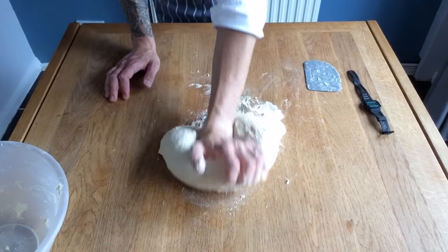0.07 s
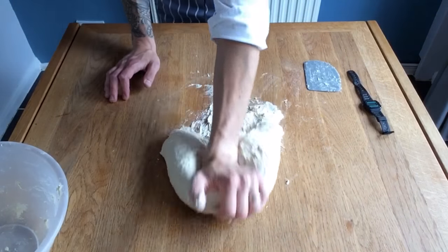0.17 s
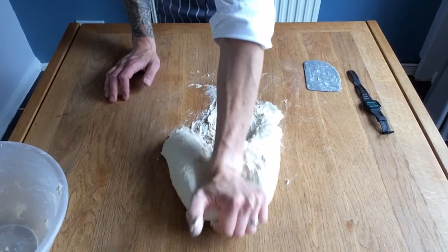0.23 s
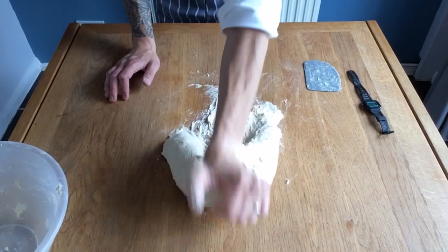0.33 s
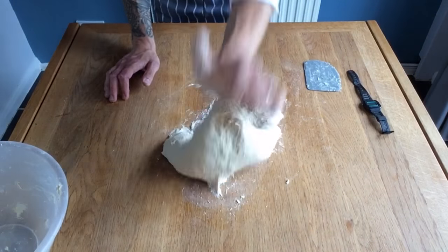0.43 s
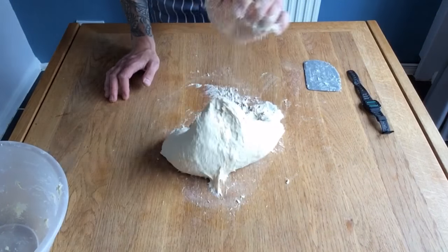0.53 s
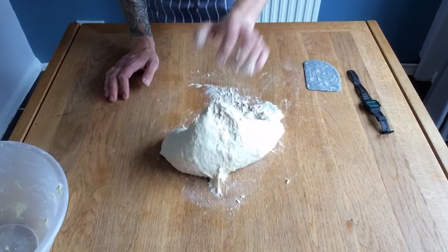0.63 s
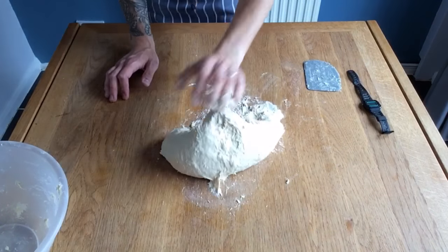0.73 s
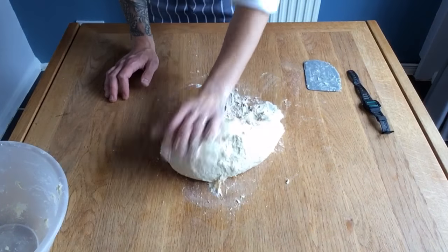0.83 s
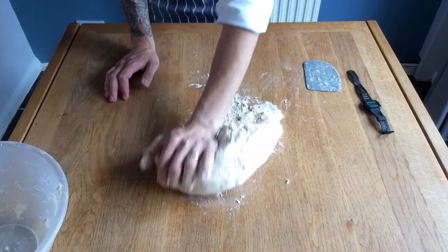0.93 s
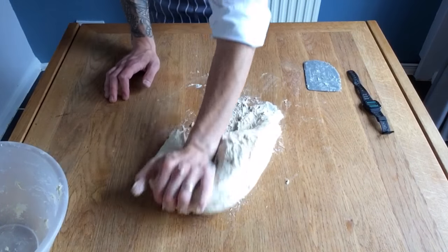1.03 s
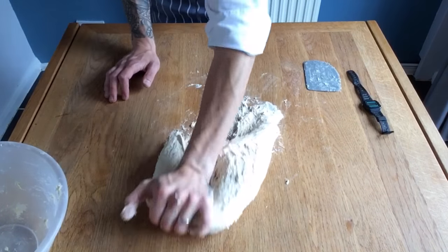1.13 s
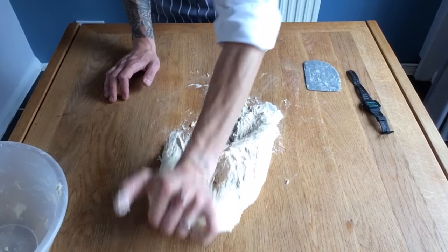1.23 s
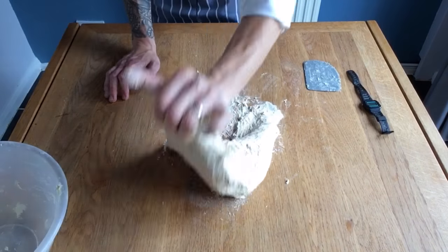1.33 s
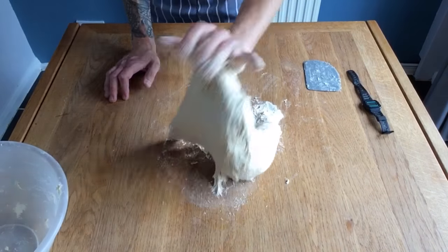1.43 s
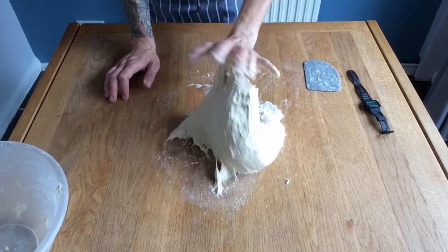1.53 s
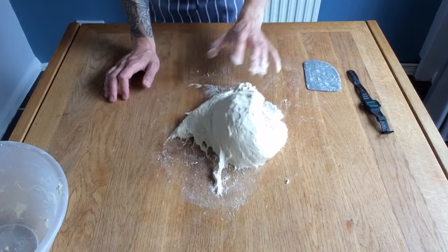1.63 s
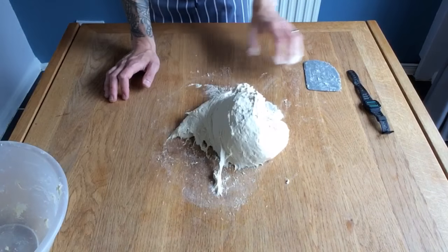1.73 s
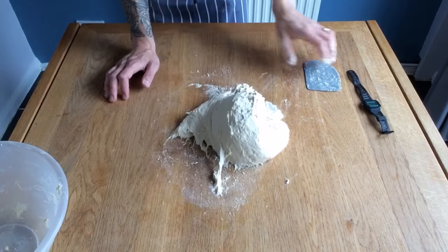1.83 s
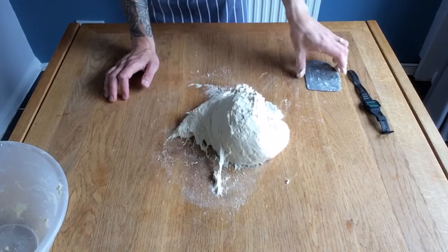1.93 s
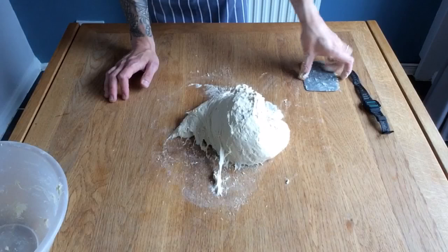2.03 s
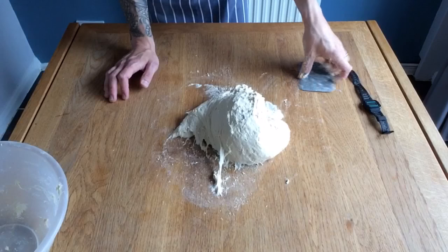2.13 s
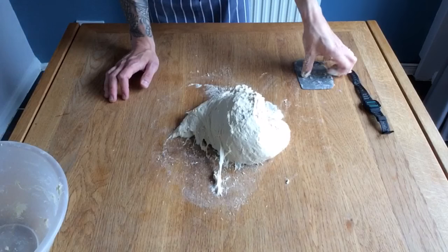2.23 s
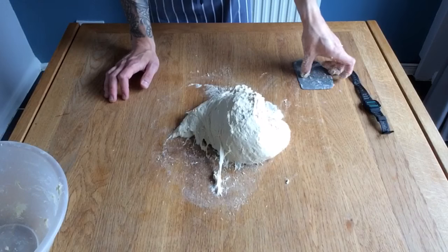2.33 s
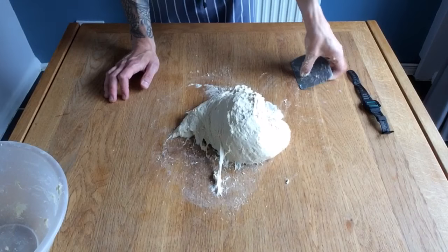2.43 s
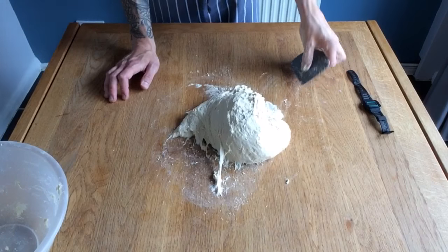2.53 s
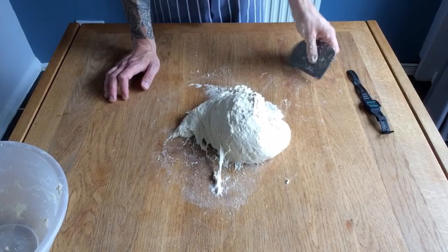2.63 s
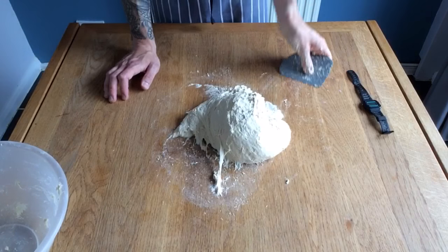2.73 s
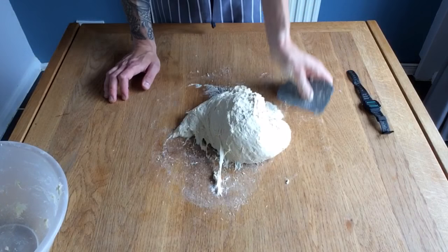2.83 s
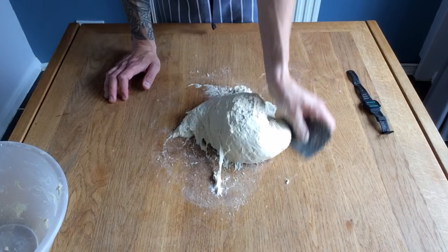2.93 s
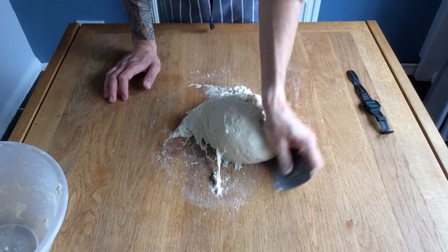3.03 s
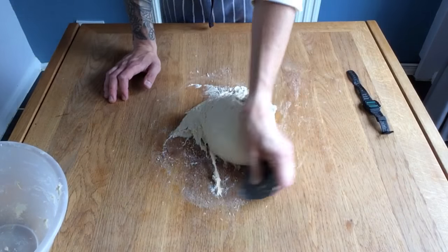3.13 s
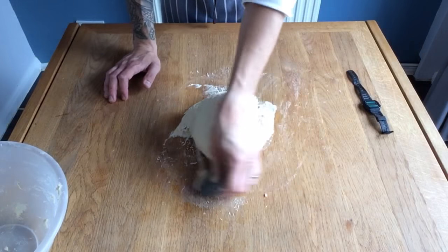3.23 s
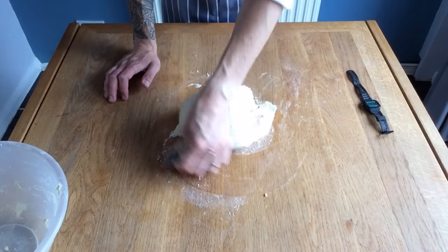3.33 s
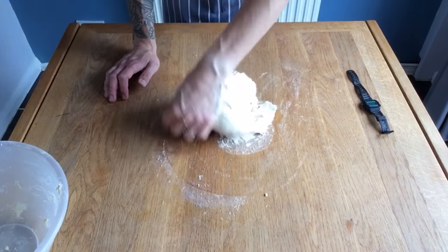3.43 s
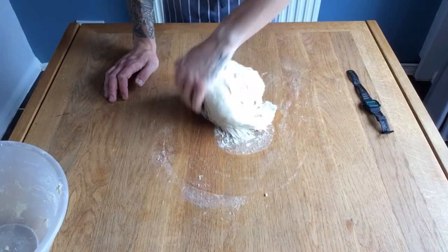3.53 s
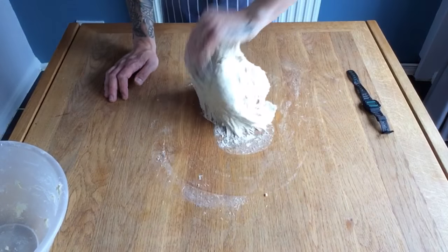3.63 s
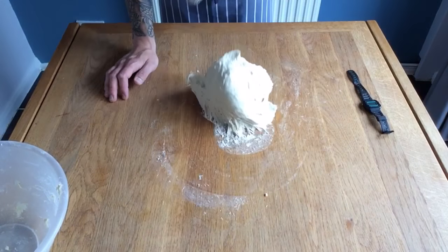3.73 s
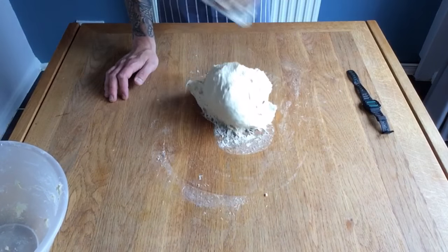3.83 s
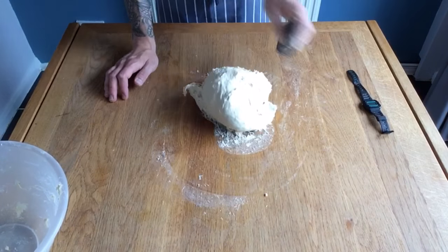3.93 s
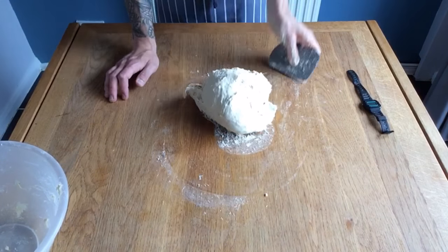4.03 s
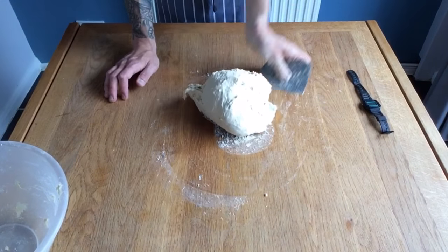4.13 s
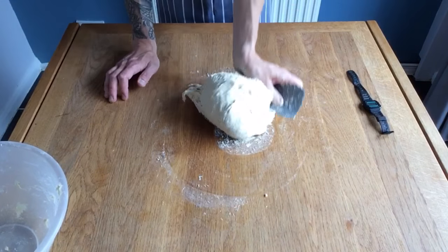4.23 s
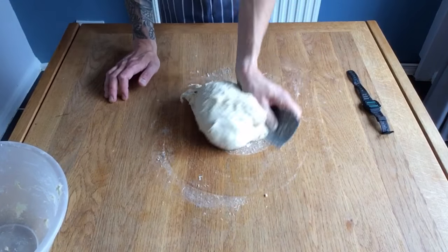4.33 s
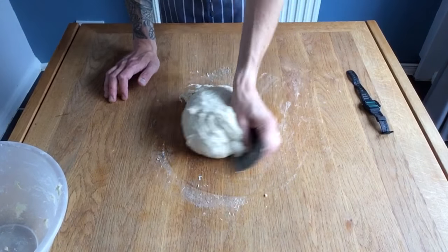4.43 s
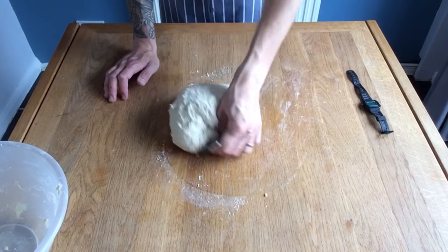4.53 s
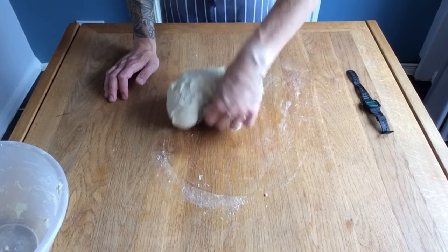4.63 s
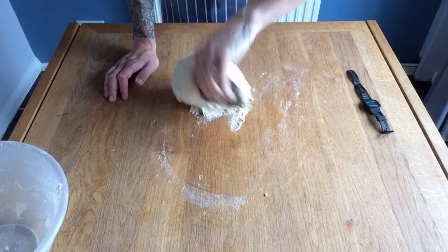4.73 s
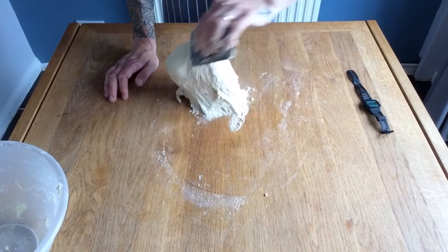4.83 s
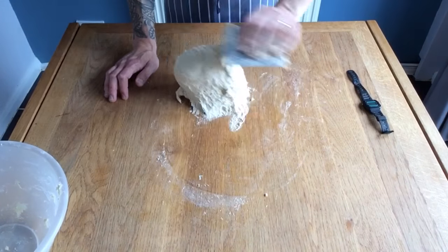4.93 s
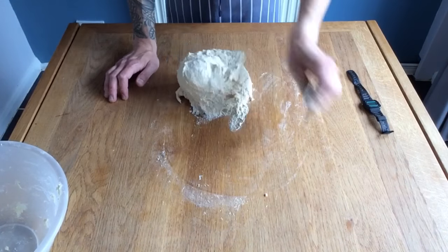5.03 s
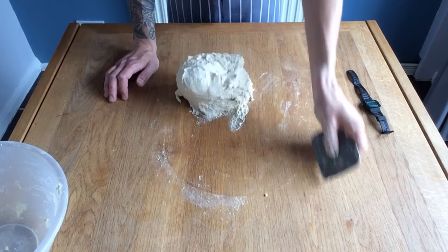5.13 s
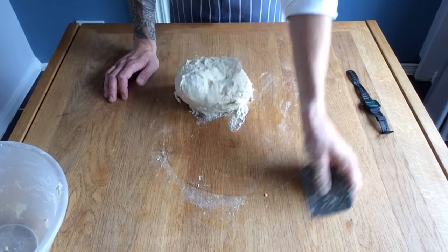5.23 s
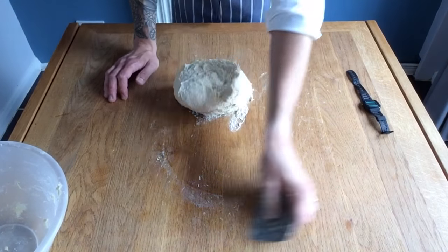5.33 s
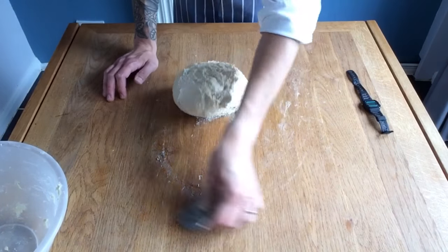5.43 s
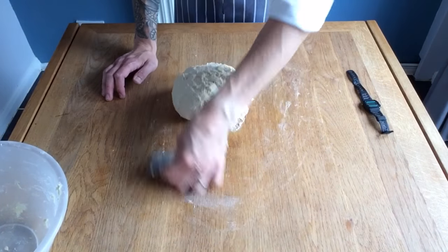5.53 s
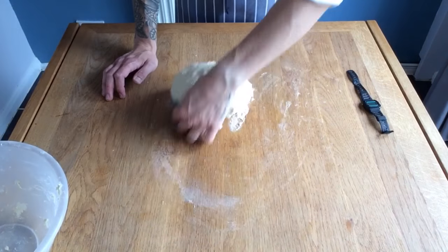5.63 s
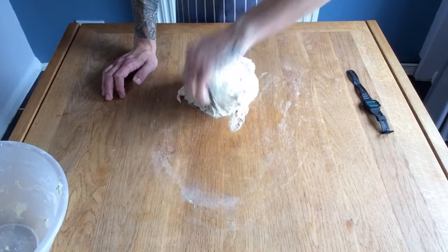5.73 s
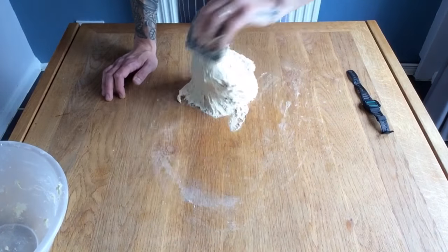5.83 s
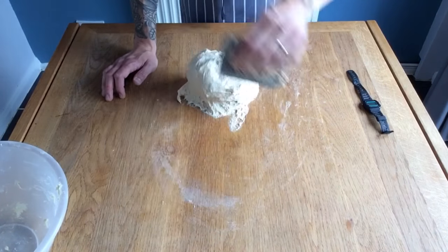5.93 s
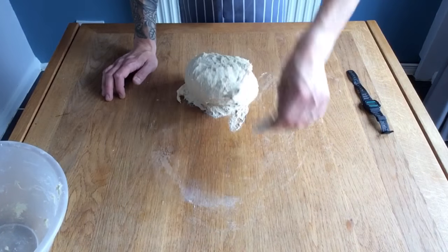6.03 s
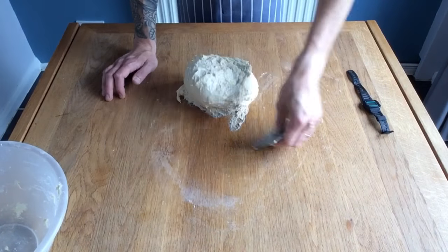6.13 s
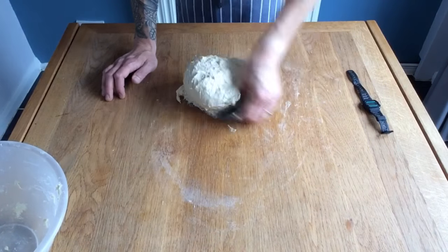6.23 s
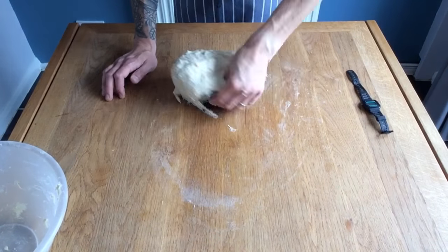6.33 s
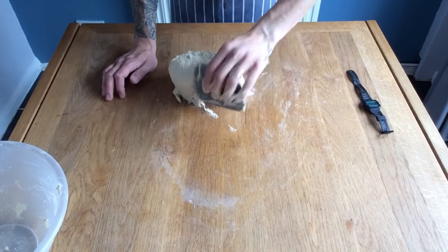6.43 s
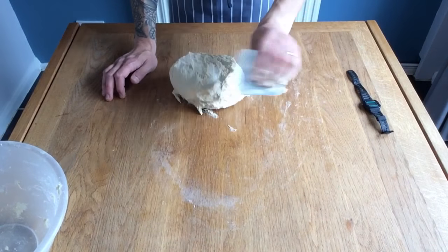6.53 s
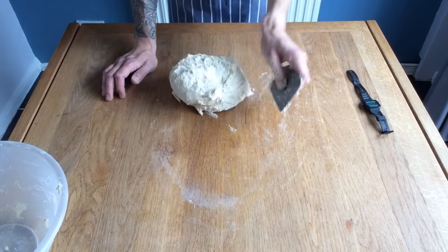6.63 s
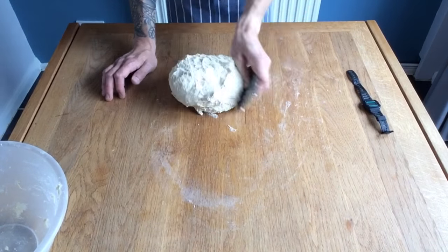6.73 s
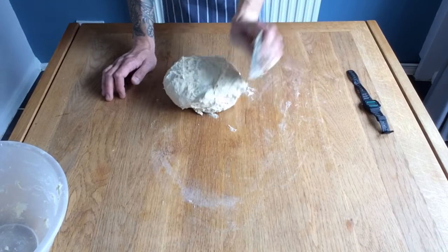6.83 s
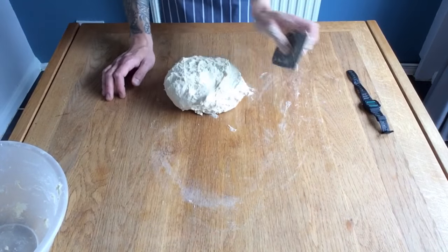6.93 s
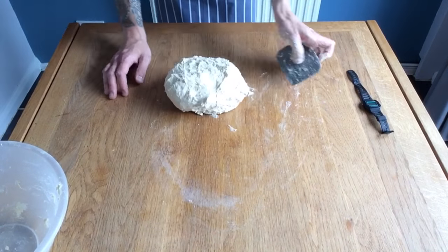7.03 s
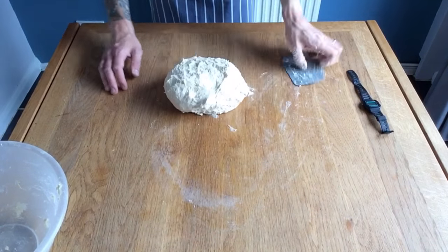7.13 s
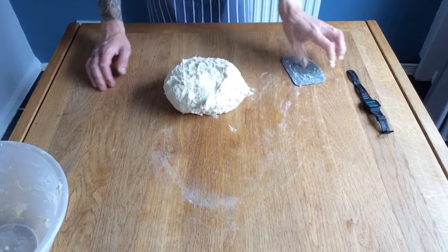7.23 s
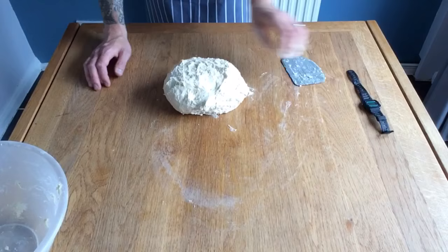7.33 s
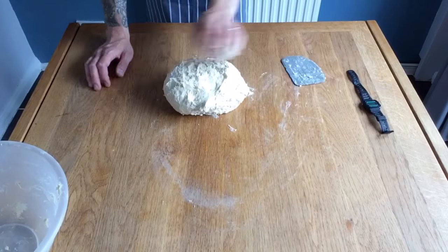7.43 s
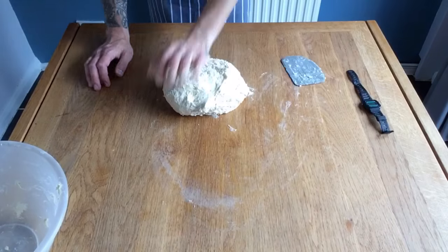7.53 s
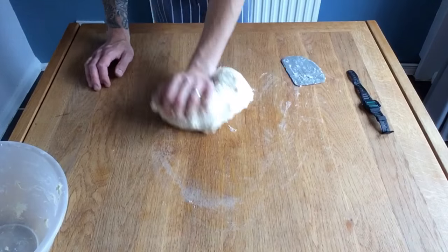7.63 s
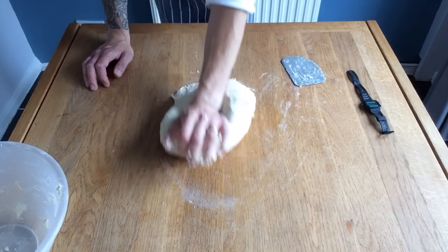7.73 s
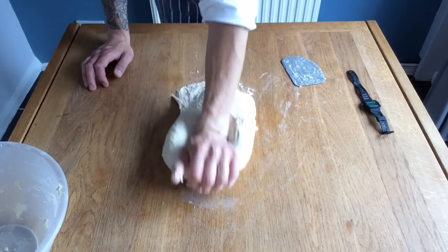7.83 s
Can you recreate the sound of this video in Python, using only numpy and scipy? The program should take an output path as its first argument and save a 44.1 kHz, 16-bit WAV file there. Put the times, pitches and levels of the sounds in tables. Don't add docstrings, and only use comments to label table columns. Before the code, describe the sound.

Close up in a small, reflective kitchen with quiet room hush: damp dough peels off skin with a fine crackling fizz while the tabletop booms softly. After light plastic ticks, a thin scraper edge rubs gritty strokes over floured wood, the later ones starting with sharp knocks. It slaps down flat, bounces and rattles to rest, then sticky kneading resumes gently.

```python
import sys
import numpy as np
from scipy import signal
from scipy.fft import rfft, irfft, next_fast_len
from scipy.io import wavfile
from scipy.ndimage import uniform_filter1d

SR = 44100
rng = np.random.default_rng(int(sys.argv[2]) if len(sys.argv) > 2 else 0)


def how_loud(loudness_db):
    steps = np.asarray(loudness_db, float) / 20
    return 10 ** steps


def dump(signal):
    limited = np.clip(np.atleast_2d(signal).T, -1, 1)
    pcm = np.round(limited * 32767).astype(np.int16)
    wavfile.write(sys.argv[1], SR, pcm)


N = 347508

# (frequency [Hz], level [dB per Hz])
AIR_COLOUR = [(12, -52), (20, -15), (161, -5.5), (258, -11.5), (331, -6.5), (488, -16), (610, -11.5),
              (783, -17), (1960, -23), (2890, -26), (7640, -30), (8540, -33.5), (14100, -34), (15300, -35)]
AIR_DB = -65
# (frequency [Hz], width [Hz], level [dB])
APPLIANCE_HUM = [(156.2, 4.4, -71)]
# (time [s], level [dB])
FAR_WHINE = [
    [(0.3, -82), (0.524, -71), (0.8, -75), (0.95, -90), (1.2, -89)],
    [(1.8, -84), (1.83, -89), (2.05, -79)],
    [(2.15, -76), (2.438, -77), (2.45, -79)],
]
# (frequency [Hz], time to fall 60 dB [s])
KITCHEN_RING = [(125, 0.41), (500, 0.29), (2000, 0.36), (5000, 0.065), (12000, 0.2)]

# (frequency [Hz], width [Hz], level [dB])
TABLE_MODES = [(73.4, 48, -19), (130.5, 12, 3), (219.2, 15, -2), (250.5, 20, -1), (333.4, 44, -2),
               (385.7, 34, -1.5), (452, 37, -3), (530, 14, -3.5), (608, 103, 1.5)]
# (frequency [Hz], width [Hz], level [dB])
TOP_RING = [(258, 9, 5), (382, 9, 16)]
# (frequency [Hz], width [Hz], level [dB])
WOOD_MODES = [(725, 130, -3.5), (1046, 73, 2), (1400, 30, -10), (1947, 47, 0), (3150, 110, -11)]
# (frequency [Hz], width [Hz], level [dB])
PLASTIC_MODES = [(932, 280, 5.5), (1123, 44, 7.5), (1390, 22, 2.5), (1820, 600, 7.5), (1976, 66, 7),
                 (2480, 110, -12)]
# (frequency [Hz], width [Hz], level [dB])
EDGE_MODES = [(3320, 2700, 17), (4170, 210, -4), (5530, 320, -24), (6580, 340, 15), (7500, 630, -4)]

# (frequency [Hz], level [dB per Hz])
FIZZ_COLOUR = [(1470, -8), (2500, -5.5), (4430, -4), (5240, -4.5), (7740, -3), (8810, -7.5), (14700, -6),
               (15500, -2.5)]
# (frequency [Hz], level [dB per Hz])
SQUELCH_COLOUR = [(290, -10), (500, 3.5), (757, -15), (828, 1), (1110, -2), (1640, -5.5), (3500, -13.5),
                  (4550, -15.5), (7700, -120)]
# (frequency [Hz], level [dB per Hz])
EDGE_COLOUR = [(120, -55), (300, -34), (700, 1), (1300, 2.5), (2500, -3.5), (5000, -17), (7800, -24.5),
               (9000, -56)]
# (frequency [Hz], level [dB per Hz])
FLOUR_COLOUR = [(3000, -6), (6000, 3), (8000, 0), (11000, -6), (15500, -6)]

# (peak time [s], length [s], fizz [dB], wet squelch [dB])
PULLS = [(0.057, 0.13, -64, -71), (0.219, 0.36, -65, -59), (.44, 0.41, -54.5, -59.5),
         (0.951, .14, -75, -66.5), (1.362, 0.51, -53.5, -59), (1.624, 0.28, -64, -68),
         (2.144, 0.077, -55.5, -64), (2.4, 0.059, -67, -58.5), (2.509, 0.089, -63, -54.5),
         (2.25, 0.15, -68, -62.5), (2.721, 0.28, -75, -66.5), (4.385, 0.087, -58, -58),
         (4.603, .1, -59, -59), (3.722, 0.22, -59, -70), (4.86, 0.15, -57.5, -72), (4.976, 0.16, -67, -74),
         (5.816, 0.13, -65.5, -66), (5.891, 0.14, -60, -71), (7.02, 0.085, -69, -64),
         (7.106, 0.23, -67, -64), (7.437, 0.15, -70, -65.5), (7.799, 0.23, -65, -64.5)]
# (time [s], fall [s], fizz [dB], wet squelch [dB])
SNAPS = [
    (.107, 0.12, -62, -44),
    (1.693, 0.12, -61.5, -52.5),
    (2.061, 0.32, -90, -62),
    (2.409, 0.12, -76, -59.5),
    (2.5, 0.19, -64, -54.5),
    (6.528, 0.065, -57, -61),
    (7.3, 0.25, -64, -55),
    (7.626, 0.11, -62.5, -56.5),
    (7.836, 0.077, -68, -63),
]
# (peak time [s], length [s], top [dB], legs over the top [dB], favoured pitch [Hz])
LEANS = [(0.041, 0.074, -58.5, -9, 195), (0.239, 0.11, -53, -23, 338), (0.457, 0.41, -58.5, -16, 283),
         (.8, 0.87, -75, -16, 215), (1.321, 0.17, -52.5, -31, 310), (1.431, 0.43, -58.5, -17, 232),
         (1.63, 0.097, -53.5, -23, 250), (1.73, .16, -55.5, -6, 202), (2.06, 0.17, -50.5, -12, 175),
         (2.513, 0.23, -58.5, -10, 370), (2.759, 0.09, -57.5, -2, 333), (2.989, 0.25, -53.5, -13, 250),
         (3.94, 0.2, -65, -10, 170), (4.117, 0.11, -66, -8, 185), (4.288, 0.12, -53, 0, 290),
         (4.847, .4, -69, -17, 202), (6.0, 0.45, -65.5, -14, 195), (6.36, 0.15, -58.5, 3, 200),
         (6.533, 0.095, -60, -17, 205), (7.098, 0.26, -70, -14, 280), (7.4, .2, -56.5, -20, 373),
         (7.697, 0.088, -51.5, -22, 230), (7.643, 0.15, -60, -13, 240), (7.801, 0.15, -60, -7, 215)]
# (time [s], fall [s], top [dB], legs over the top [dB], favoured pitch [Hz])
THUMPS = [
    (.112, 0.1, -35, -18, 327),
    (2.136, 0.2, -37.5, -14, 310),
    (2.33, 0.17, -44.5, -29, 196),
    (4.2, 0.17, -36, -20, 420),
    (5.264, 0.36, -43, -35, 560),
    (5.691, 0.14, -55, 5, 180),
    (6.228, .25, -45.5, -15, 307),
    (6.787, 0.17, -31.5, -18, 446),
    (7.168, 0.3, -40.5, -21, 386),
    (7.251, 0.12, -45, -12, 280),
]
# (peak time [s], rise [s], fall [s], frequency [Hz], level [dB])
HUMS = [(1.688, 0.075, 0.02, 255.5, -43.5), (2.19, 0.063, 0.24, 135, -47), (2.99, .1, 0.16, 254.5, -45.5),
        (4.47, 0.046, .04, 252, -51), (6.36, .05, .08, 130.5, -56), (7.275, .03, 0.034, 257, -40),
        (7.275, 0.0298, 0.17, 134.4, -44), (7.311, 0.0118, 0.034, 391, -33.5),
        (7.385, .03, 0.065, 384.4, -46.5), (5.716, 0.038, .05, 66, -40), (7.36, .04, .06, 1400, -56)]
# (time [s], length [s], from [Hz], to [Hz], level [dB])
SQUEAKS = [
    (.57, .05, 14500, 14000, -84),
    (.75, .08, 13200, 12100, -83),
    (.7, .05, 11200, 10700, -83),
    (2.67, .08, 11900, 13700, -77),
    (2.7, .06, 8700, 9300, -82),
    (6.09, .05, 10800, 10900, -81),
    (6.57, .05, 11000, 10900, -79),
    (6.64, .08, 10800, 10700, -87),
]

# (time [s], blow [dB], table over the tick [dB],
# favoured table pitch [Hz], favoured pitch of the plastic or wood [Hz])
HAND_BLOWS = [
    (0.104, -30.5, -6.5, 228, 1030),
    (0.222, -43, -12, 300, 1100),
    (1.689, -43.5, 9.5, 290, 940),
    (1.697, -50, -12, 258, 1950),
    (5.681, -43.5, 11, 132, 1920),
    (5.698, -71, 28, 58.3, 1000),
]
CORNER_BLOWS = [
    (2.5, -52, -10, 430, 4500),
    (6.533, -42.5, -11, 147, 2000),
    (2.3252, -46.5, 9.5, 247, 1800),
    (2.107, -46, 13, 390, 1700),
    (2.132, -50.5, 23, 355, 680),
    (4.778, -62, 7, 165, 1650),
    (4.84, -48, -27, 164, 3800),
]
SIDE_BLOWS = [(7.057, -47.5, -16, 162, 1380), (2.384, -60, 5, 212, 1210), (2.4933, -53, -19, 415, 1820),
              (2.756, -50, 9.5, 440, 1480), (2.841, -39, -6, 253, 1180), (3.718, -49, -4, 246, 1620),
              (3.989, -54.5, -1, 164, 834), (4.137, -38, -11, 336, 802), (6.221, -50.5, 6, 305, 1400),
              (7.1, -53, -2, 257, 1100), (6.783, -27, -7, 262, 2590), (7.1645, -32, -12, 250, 2400),
              (7.628, -51.5, 2, 233, 2740), (7.838, -43.5, 1, 393, 1150)]
FLAT_BLOWS = [
    (5.2598, -32, -9, 590, 1100),
    (6.2305, -31.5, -13, 474, 1300),
    (4.1465, -23, -10.5, 540, 1490),
    (7.1825, -26, -6, 483, 1510),
    (7.24, -21.5, 7, 381, 1750),
    (7.292, -42, -10, 380, 1700),
    (7.304, -49, 17, 387, 1400),
    (7.351, -56, 15.5, 350, 1400),
]

# (time [s], pressure [dB], blade ring [Hz], edge speed [dB]) first drag, out and
DRAG_1 = [(2.755, -59, 1355, -80), (2.875, -37.5, 1226, -49.5), (2.913, -29.5, 1202, -46),
          (2.951, -32.5, 1150, -49), (3.027, -38.5, 1330, -50), (3.049, -37, 1500, -51),
          (3.085, -35, 1520, -55), (3.175, -43, 1424, -60.5), (3.2, -51, 1370, -62),
          (3.22, -47.5, 1480, -60), (3.286, -41.5, 1440, -57.5), (3.312, -46.5, 1476, -58),
          (3.362, -37, 1333, -58), (3.404, -47, 1370, -58), (3.448, -44, 1534, -58),
          (3.48, -48, 1500, -62.5), (3.64, -70.5, 1440, -71.5)]
DRAG_2 = [(4.154, -41, 1430, -65), (4.182, -43, 1460, -60), (4.22, -27, 1455, -44),
          (4.236, -28.5, 1533, -41.5), (4.29, -34.5, 1550, -53.5), (4.332, -42.5, 1390, -58),
          (4.378, -39.5, 1245, -55), (4.44, -45, 1350, -62),
          (4.46, -46, 1390, -60), (4.524, -38, 1544, -53.5), (4.548, -40, 1548, -54),
          (4.79, -71, 1500, -75.5)]
DRAG_3 = [(5.262, -37.5, 1254, -64), (5.308, -32, 1067, -50), (5.35, -30.5, 1212, -41.5),
          (5.398, -34.5, 1320, -39), (5.434, -37, 1120, -42), (5.484, -40.5, 1490, -51),
          (5.53, -46, 1410, -56.5),
          (5.55, -45, 1360, -55.5), (5.604, -38.5, 1390, -54.5), (5.664, -40.5, 1582, -48),
          (5.706, -52, 1730, -56.5), (5.762, -62.5, 1520, -68), (5.8, -67, 1670, -71)]
# (time [s], pressure [dB], blade ring [Hz], edge speed [dB])
FLICKS = [
    [(6.231, -44, 1410, -71), (6.264, -42, 1485, -51), (6.374, -52, 1620, -65.5), (6.41, -63, 1390, -70.5),
     (6.52, -68, 1380, -68)],
    [(6.782, -31.5, 2560, -36.5), (6.798, -31, 1600, -45), (6.826, -34.5, 1464, -54.5),
     (6.854, -42, 1200, -62), (7.0, -70.5, 1390, -74.5)],
]
# (top [dB], favoured pitch [Hz], legs over the top [dB], bare wood [dB])
STROKE_WEIGHT = [
    (-55, 390, -16.5, -1.2),
    (-53.5, 316, -16.5, 1),
    (-53, 385, -34, -1),
    (-51.5, 236, -21, -0.3),
    (-52.5, 340, -10.5, 4.5),
]
# (time [s], level over the steady rub [dB])
SNAGS = [(2.8448, 14.2), (2.8715, 18), (2.9157, 15.2), (2.9389, 9), (2.9896, 15), (3.0708, 14.6),
         (3.0869, 14), (3.2139, 12), (3.3224, 16), (3.4199, 16), (3.4532, 17), (3.4698, 14.5), (3.499, 12),
         (4.1727, 19), (4.225, 15), (4.2419, 15.0), (4.285, 16), (4.3474, 11), (4.3912, 13), (4.517, 11),
         (4.5424, 16), (4.6056, 13), (4.6263, 10), (5.3312, 16), (5.3543, 17), (5.364, 13.6),
         (5.4012, 18.5), (5.4186, 13.0), (5.4582, 12.9), (5.4709, 10), (5.5222, 14.2), (5.573, 18),
         (5.6333, 13.8), (5.6572, 17), (6.2572, 18), (6.266, 11), (6.324, 17), (6.353, 10), (6.79, -1),
         (6.7983, 14), (6.844, 12), (6.8646, 15), (6.884, 12.9)]
# (time [s], length [s], pressure [dB], fall [dB], blade ring [Hz])
SKIDS = [
    (5.2482, .013, -46.5, 0, 1710),
    (7.165, 0.018, -40, 13, 1690),
    (7.184, 0.05, -33.5, 15, 1380),
    (7.24, 0.06, -37, 12, 1560),
    (7.3, 0.14, -52, 16, 1410),
]

SWELL_DEPTH_DB, RISE_S = 32, 0.008
LEGS_LAG_S, LEGS_LAG_DB = 0.025, 10
HUM_DEPTH_DB = 20
HAND_DB, CORNER_DB, SIDE_DB, FLAT_DB = -19, 7, -3, -10
PLASTIC_S, DOUGH_S = 0.007, 0.02
SOFT_HZ = 7600
SNAG_DB = 10
REST_HZ, FLEX = 1350, 1.6
GRIT_SHARE, GRIT_DB, FLOUR_DB = 0.61, 4.5, -2.5
WEIGHT_SHARE = 0.39
SKID_SPEED_DB = -31
LOW_HZ, HIGH_HZ = 44, 15400


def evened(x):
    return x / np.sqrt(np.mean(x ** 2) + 1e-20)


def read(points, hz):
    f, value = np.transpose(points)
    return np.interp(np.log(hz + 1), np.log(f + 1), value)


def colour(x, points):
    size = next_fast_len(len(x))
    gain = how_loud(read(points, np.fft.rfftfreq(size, 1 / SR)))
    return evened(irfft(rfft(x, size) * gain, size)[:len(x)])


def add(mix, s, sound):
    part = mix[round(s * SR):][:len(sound)]
    part += sound[:len(part)]


def resonate(x, hz, width):
    turn = np.exp(2j * np.pi * np.cumsum(hz * np.ones(len(x))) / SR)
    r = np.exp(-np.pi * width / SR)
    return 2 * (turn * signal.lfilter([1 - r], [1, -r], x / turn)).real


def body(x, modes, bend=1):
    return sum((-1) ** k * how_loud(db) * resonate(x, hz * bend, width) / np.sqrt(width)
               for k, (hz, width, db) in enumerate(modes))


def favoured(modes, spot_hz, fall_db):
    return [(hz, width, db - fall_db * np.log2(hz / spot_hz) ** 2) for hz, width, db in modes]


def slips(count, per_s, spread_db):
    size = how_loud(spread_db * np.minimum(rng.exponential(1, count), 4))
    sign = rng.choice([-1., 1.], count)
    return size * sign * (rng.random(count) < per_s / SR)


def wander(count, smooth):
    return evened(uniform_filter1d(rng.standard_normal(count), smooth))


def played(rows):
    s, *columns = np.transpose(rows)
    t = np.arange(s[0], s[-1], 1 / SR)
    return s[0], [np.interp(t, s, c) for c in columns]


def arch(peak, length):
    u = np.linspace(-1, 1, 9)
    return max(peak, length / 2) + u * length / 2, -SWELL_DEPTH_DB * u ** 2


def burst(s, fall):
    t = s + np.array([-RISE_S, 0, LEGS_LAG_S, max(fall, 2 * LEGS_LAG_S)])
    return t, -SWELL_DEPTH_DB * np.array([.5, 0, LEGS_LAG_S / fall, 1])


def air():
    swell_db = .5 * wander(N, 9000)
    hush = how_loud(AIR_DB + swell_db) * colour(rng.standard_normal(N), AIR_COLOUR)
    for rows in FAR_WHINE:
        s, (whine_db,) = played(rows)
        whine = evened(resonate(rng.standard_normal(len(whine_db)), 2070, 120))
        add(hush, s, how_loud(whine_db) * whine)
    for hz, width, db in APPLIANCE_HUM:
        hush += how_loud(db) * evened(resonate(rng.standard_normal(N), hz, width))
    return hush


def peeling_dough(rows):
    s, (fizz_db, squelch_db) = played(rows)
    count = len(fizz_db)
    threads = colour(slips(count, 12000, 2.8), FIZZ_COLOUR)
    pops = slips(count, 2000, 2.3)
    pockets = evened(colour(pops, SQUELCH_COLOUR) + 0.56 * evened(body(pops, WOOD_MODES)))
    mix = how_loud(fizz_db) * threads + how_loud(squelch_db) * pockets
    return s, mix * signal.windows.tukey(count, .05)


def pushed_table(rows):
    s, (top_db, legs_db, spot_hz) = played(rows)
    count = len(top_db)
    modes = favoured(TABLE_MODES[1:], spot_hz, 9.4)
    total = np.sqrt(sum(how_loud(2 * db) for hz, width, db in modes))
    top = body(slips(count, 1500, 2.1), modes) / total
    sway = rng.standard_normal(count)
    slow_rock = evened(resonate(resonate(sway, 75, 35), 75, 35))
    fast_rock = evened(resonate(resonate(sway, 132, 24), 132, 24))
    legs = slow_rock + 1.39 * fast_rock
    i = np.arange(count)
    fade = np.minimum(1, np.minimum(i, i[::-1]) / 150)
    return s, how_loud(top_db - 2.0) * (evened(top) + how_loud(legs_db) * legs) * fade


def kneading():
    for shape, rows in ((arch, PULLS), (burst, SNAPS)):
        for s, length, fizz_db, squelch_db in rows:
            t, drop_db = shape(s, length)
            yield peeling_dough(np.c_[t, fizz_db + drop_db, squelch_db + drop_db])
    for shape, rows, lag_db in ((arch, LEANS, 0), (burst, THUMPS, LEGS_LAG_DB)):
        for s, length, top_db, legs_db, hz in rows:
            t, drop_db = shape(s, length)
            late_legs_db = legs_db - lag_db * (t <= s)
            yield pushed_table(np.c_[t, top_db + drop_db, late_legs_db, hz + 0 * t])


def knock(s, blow_db, table_db, bright_db, spot_hz, tick_hz, modes, tick_s):
    t = np.arange(SR // 4) / SR
    touch = (t == 0) + 0.12 * rng.standard_normal(len(t)) * np.exp(-t / 0.0007)
    push = np.exp(-t / 0.00046) * t
    thud = np.sin(2 * np.pi * spot_hz * t) * np.tanh(2 * t * spot_hz)
    thud = thud * np.exp(-(t * spot_hz / 1.8) ** 2)
    tick = body(touch, favoured(modes, tick_hz, 6.0)) * np.exp(-t / tick_s)
    first_swing = np.sin(2 * np.pi * tick_hz * t) * np.exp(-t * tick_hz / 2.9)
    tick = tick / abs(tick).max() + 0.87 * first_swing
    boom = body(push, favoured(TABLE_MODES, spot_hz, 13.7))
    crack = resonate(resonate(touch, 3300, 3600), 3300, 3600)
    tick, boom, crack = (part / abs(part).max() for part in (tick, boom, crack))
    return s, how_loud(blow_db) * (tick + how_loud(table_db) * (0.32 * boom + thud) + how_loud(bright_db - 4.5) * crack)


def all_blows():
    blows = np.zeros(N)
    for rows, bright_db, modes, tick_s in ((HAND_BLOWS, HAND_DB, WOOD_MODES, DOUGH_S),
                                           (CORNER_BLOWS, CORNER_DB, PLASTIC_MODES, PLASTIC_S),
                                           (SIDE_BLOWS, SIDE_DB, PLASTIC_MODES, PLASTIC_S),
                                           (FLAT_BLOWS, FLAT_DB, PLASTIC_MODES, PLASTIC_S)):
        for s, blow_db, table_db, spot_hz, tick_hz in rows:
            add(blows, *knock(s, blow_db, table_db, bright_db, spot_hz, tick_hz, modes, tick_s))
    soften = signal.butter(3, SOFT_HZ, fs=SR, output="sos")
    return signal.sosfilt(soften, blows + body(blows, TOP_RING))


def squeak(s, length, from_hz, to_hz, db):
    hz = np.linspace(from_hz, to_hz, round(length * SR))
    whistle = evened(resonate(rng.standard_normal(len(hz)), hz, 60))
    return s, how_loud(db) * whistle * np.hanning(len(hz))


def rubbed_hum(peak, rise, fall, hz, db):
    t = np.arange(-rise, fall, 1 / SR)
    waver = 1 + .02 * wander(len(t), 900)
    drop_db = HUM_DEPTH_DB * np.where(t < 0, -t / rise, t / fall)
    tone = np.sin(2 * np.pi * np.cumsum(hz * waver) / SR) * signal.windows.tukey(len(t), .2)
    return peak - rise, how_loud(db - drop_db) * tone


def scraper_edge(rows):
    s, (pressure_db, ring_hz, grit_db, flour_db) = played(rows)
    count = len(ring_hz)
    judder = how_loud(wander(count, 150))
    catches = evened(slips(count, 2600, 1.9) * judder)
    for at, db in SNAGS:
        if 0 < at - s < count / SR - .001:
            catches[round((at - s) * SR)] += how_loud(db + SNAG_DB) * rng.choice([-1., 1.])
    ring = evened(resonate(resonate(catches, ring_hz, 700), ring_hz, 700))
    plate = evened(body(catches, PLASTIC_MODES, ring_hz / 1400))
    patchy = how_loud(1.2 * wander(count, 500))
    grains = evened(slips(count, 7000, 2.1) * judder * patchy) + .5 * catches
    edge = colour(grains, EDGE_COLOUR)
    rasp = signal.sosfilt(signal.butter(2, 2600, "high", fs=SR, output="sos"), edge)
    edge_ring = evened(body(grains, EDGE_MODES, np.sqrt(ring_hz / 1390)))
    grit = evened(evened(rasp) + 0.43 * edge_ring)
    flour = colour(rng.standard_normal(count), FLOUR_COLOUR)
    core = evened(ring + 0.63 * plate + 0.68 * edge)
    mix = core + how_loud(grit_db - 3.0) * grit + how_loud(flour_db + 3.0) * flour
    return s, how_loud(pressure_db) * mix * signal.windows.tukey(count, min(1, 200 / count))


def scraping():
    drags = [DRAG_1, DRAG_2, DRAG_3]
    skids = []
    for s, length, db, fall_db, hz in SKIDS:
        end_db = db - fall_db
        skids.append([(s, db, hz, db + SKID_SPEED_DB), (s + length, end_db, hz, end_db + SKID_SPEED_DB)])
    for k, rows in enumerate(drags + FLICKS + skids):
        s, pressure_db, ring_hz, speed_db = np.transpose(rows)
        if k < len(drags):
            ring_hz = REST_HZ * (ring_hz / REST_HZ) ** FLEX
        top_db, spot_hz, legs_db, bare_db = STROKE_WEIGHT[min(k, len(STROKE_WEIGHT) - 1)]
        fast_db = speed_db - pressure_db
        grit_db = GRIT_DB + GRIT_SHARE * fast_db + bare_db
        flour_db = FLOUR_DB + fast_db - bare_db
        yield scraper_edge(np.c_[s, pressure_db, ring_hz, grit_db, flour_db])
        if k < len(STROKE_WEIGHT):
            moving_db = top_db + WEIGHT_SHARE * (pressure_db + 42.5)
            yield pushed_table(np.c_[s, moving_db, legs_db + 0 * s, spot_hz + 0 * s])


def kitchen(x):
    taps = np.zeros(SR // 2)
    at = np.arange(60, len(taps) - 20, 20)
    taps[at + rng.integers(0, 20, len(at))] = rng.choice([-1., 1.], len(at))
    hz, t, z = signal.stft(taps, SR, nperseg=256)
    decay = how_loud(-60 * t / read(KITCHEN_RING, hz)[:, None])
    tail = signal.istft(z * decay, SR, nperseg=256)[1]
    return signal.fftconvolve(x, tail / np.linalg.norm(tail))[:N]


def scene():
    rubbing = np.zeros(N)
    squeaks = (squeak(*row) for row in SQUEAKS)
    hums = (rubbed_hum(*row) for row in HUMS)
    for s, sound in (*kneading(), *squeaks, *hums, *scraping()):
        add(rubbing, s, sound)
    blows = all_blows()
    wet = kitchen(how_loud(-10.5) * rubbing + how_loud(-4.5) * blows)
    return (how_loud(-0.5) * rubbing + blows + wet + air())[None]


def low_pass(x):
    return signal.sosfilt(signal.butter(12, 16300, fs=SR, output="sos"), x)


def record(dry):
    thin = signal.sosfilt(signal.butter(2, LOW_HZ, "high", fs=SR, output="sos"), dry)
    top_cut = signal.firwin(511, HIGH_HZ, window=("kaiser", 9), fs=SR)
    return low_pass(signal.oaconvolve(thin, top_cut[None], "same"))


dry = scene()
out = record(dry)
dump(out)
```